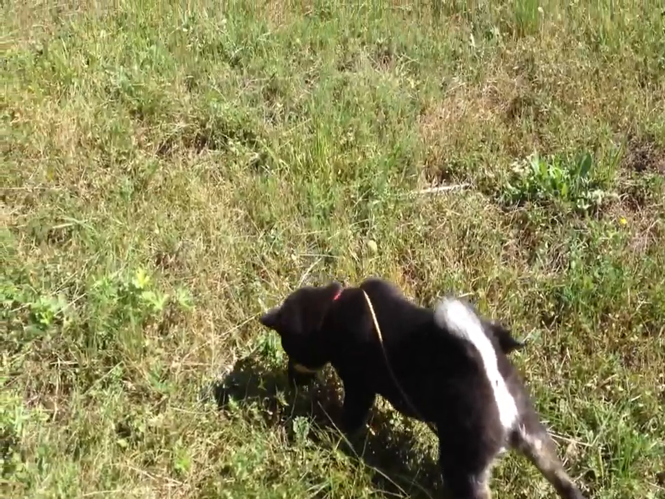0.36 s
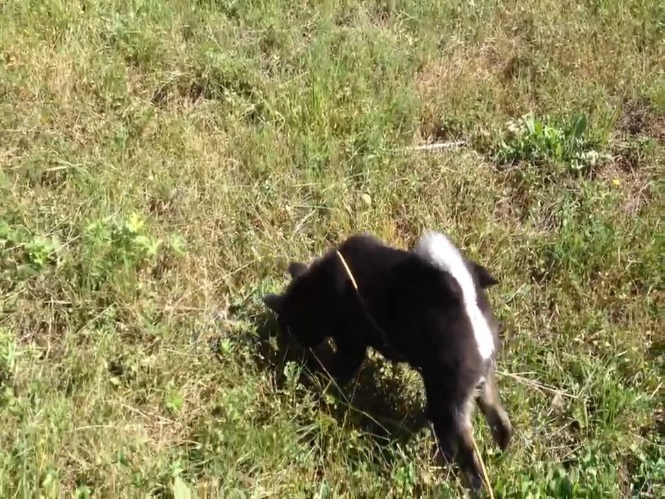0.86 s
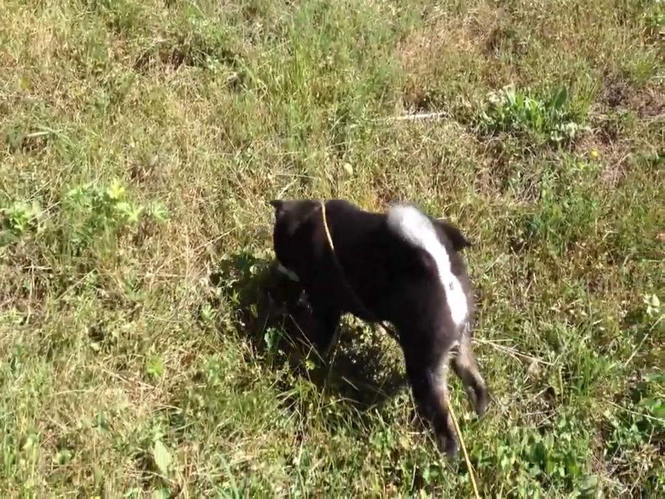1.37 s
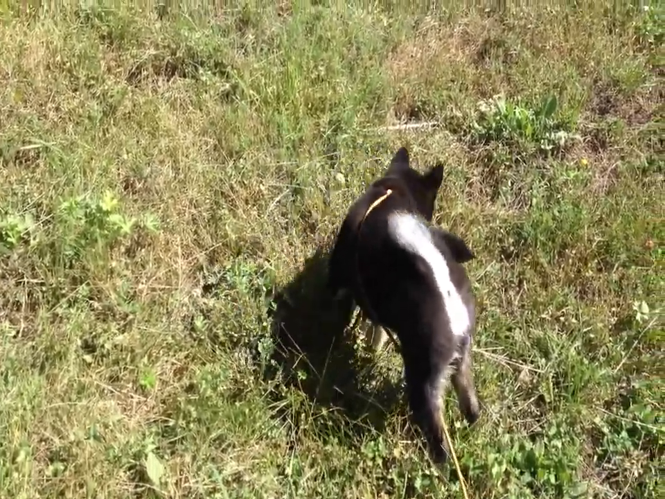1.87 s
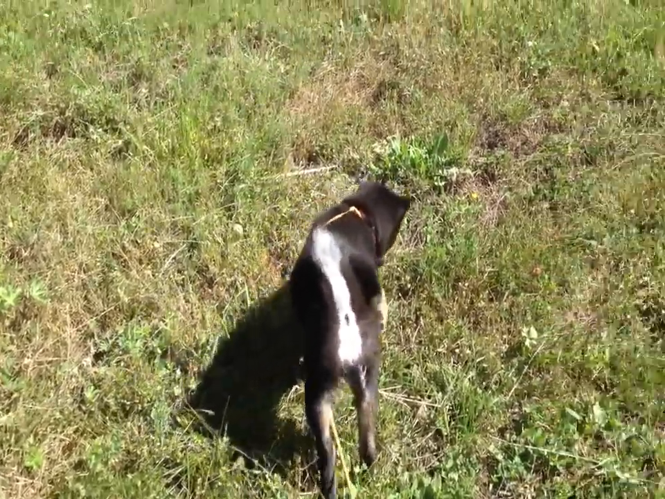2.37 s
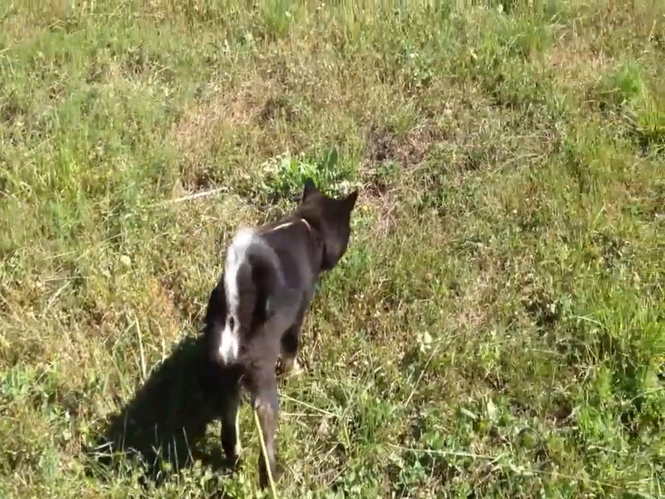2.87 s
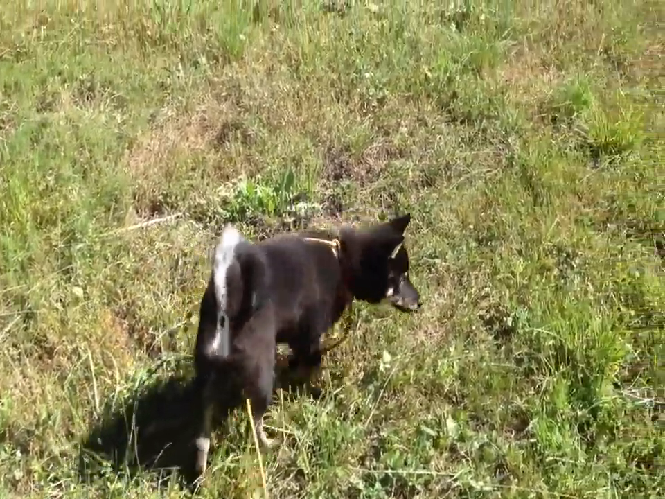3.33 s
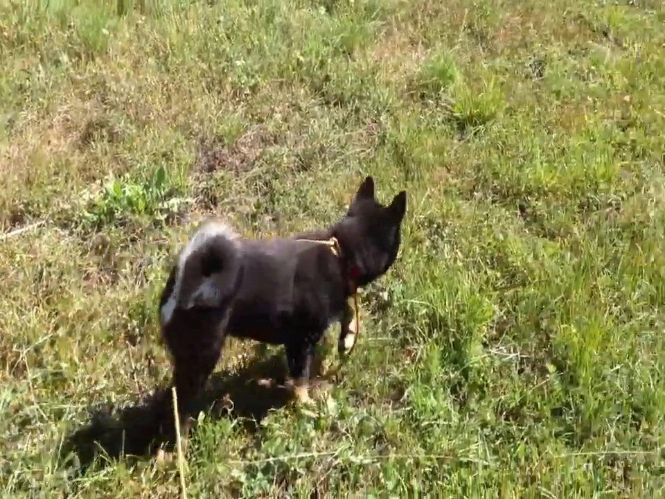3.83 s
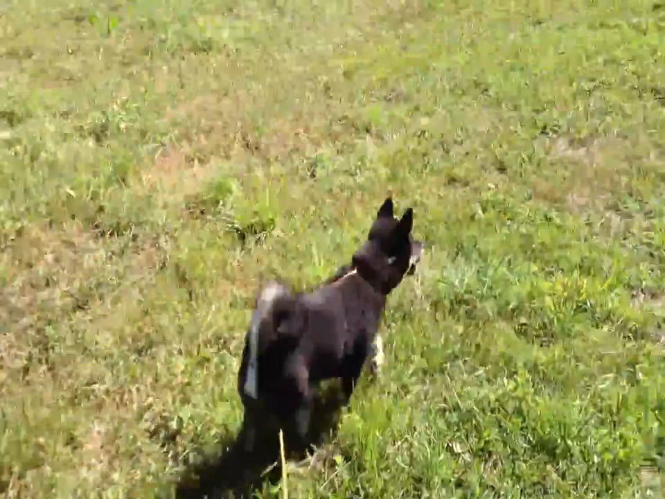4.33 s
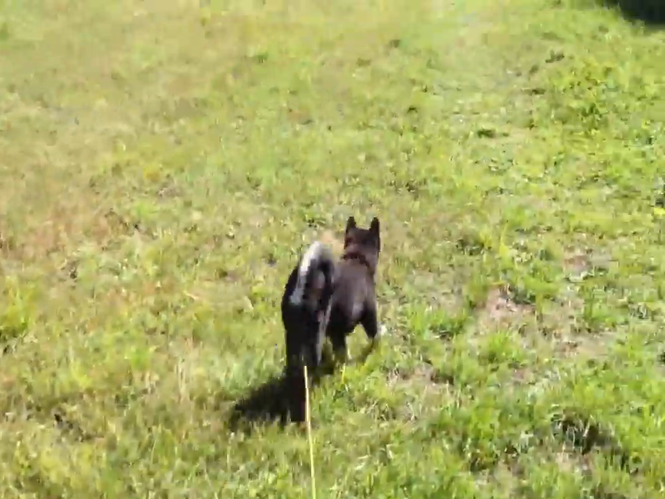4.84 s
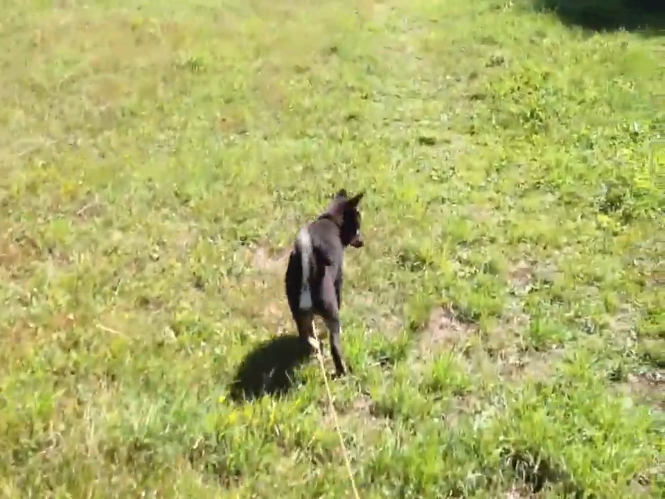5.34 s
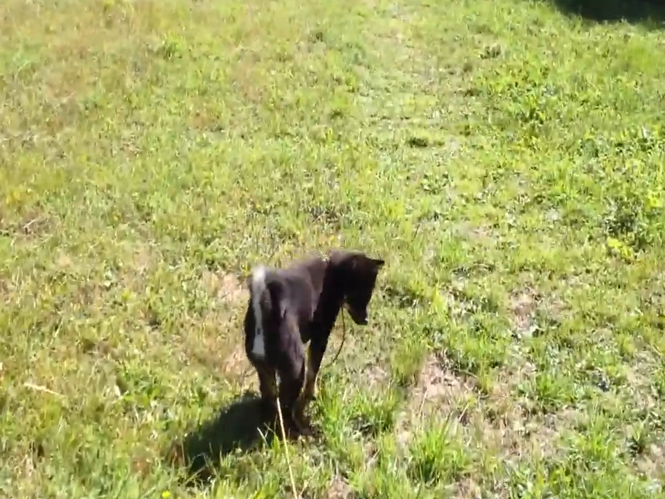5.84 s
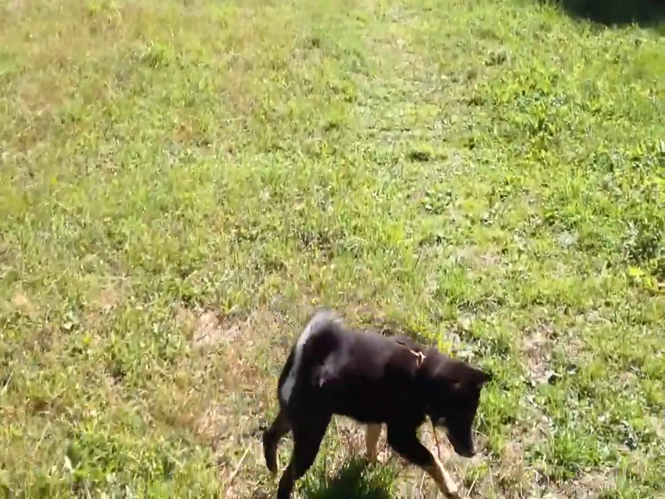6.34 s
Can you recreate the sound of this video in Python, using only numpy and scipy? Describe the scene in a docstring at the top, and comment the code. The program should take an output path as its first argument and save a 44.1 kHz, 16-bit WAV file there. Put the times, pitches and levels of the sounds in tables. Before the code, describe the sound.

Insects hiss and throb over a summer field with grasshoppers rasping short trills; a small dog snorts once, then trots through crackling dry grass.

```python
"""A throbbing insect chorus lies over a summer field with two far engines droning; near grasshoppers
rasp short trills. A small dog snorts, then trots through dry grass, stems snapping under its paws.
Snort, grass, chorus and air are shaped noise or random ticks; trills are pegs dragged over a resonant wing;
bumps on the handheld housing are short sines, and the engines are sums of firing orders."""
import sys
import numpy as np
from scipy import signal
from scipy.fft import rfft, irfft
from scipy.io import wavfile
from scipy.ndimage import uniform_filter1d

SR = 44100
rng = np.random.default_rng(int(sys.argv[2]) if len(sys.argv) > 2 else 0)


def boost(x):
    """Linear amplitude factor 10**(x/20) for a level x in decibels (scalar or array-like)."""
    u = np.asarray(x, float) / 20
    return 10 ** u


def wav_record(signal):
    """Record a signal, one row per channel, as 16-bit PCM in the file named by sys.argv[1]."""
    frames = np.transpose(np.atleast_2d(signal))
    bounded = np.clip(frames, -1, 1)
    # unit amplitude maps onto the largest positive 16-bit level
    quanta = np.round(bounded * 32767).astype(np.int16)
    wavfile.write(sys.argv[1], SR, quanta)


N = 284220
TIME = np.arange(N) / SR


def snort():
    """Air forced through the nostrils, fluttering; the harder the blow, the larger the share of hiss."""
    # the blow: t/s, level/dB
    blow = [(1.41, -81), (1.43, -48), (1.45, -39), (1.465, -36.5), (1.485, -40), (1.505, -44),
            (1.515, -49.5), (1.55, -63), (1.6, -78)]
    # hollow of the muzzle: f/Hz, relative level/dB per Hz
    muzzle = [(200, -15), (350, -10), (700, -10.5), (1300, -6), (2000, -10.5), (3000, -8), (4500, -7),
              (7000, -22)]
    # hiss at the nostrils: f/Hz, relative level/dB per Hz
    nostrils = [(1500, -39), (3000, -16), (4500, -6.5), (6500, -3.5), (8500, -5), (11500, -15.5)]
    all_hiss_db, hiss_range_db = -35.3, 46  # all hiss at the first level, none this far below it
    level_db = curve(blow, 1)
    hollow = colour(rng.standard_normal(N), muzzle)
    hiss = colour(rng.standard_normal(N), nostrils)
    hiss_share = 1 - (all_hiss_db - level_db) / hiss_range_db
    breath = patchy(blend(hollow, hiss, hiss_share), depth_db=2.0)
    return breath * boost(level_db + 0.46 * drift(hz=120))


def grass():
    """Dry stems rub in clumps of ticks and crunch under weight; single stems crack, with a short hollow thud."""
    # light swish of blades: f/Hz, relative level/dB per Hz
    blades = [(400, -30), (1000, -5.5), (1600, 1), (2500, -0.5), (5000, 2), (8000, -5), (11500, -37)]
    # pressed turf: f/Hz, relative level/dB per Hz
    turf = [(120, 1.5), (300, -2), (600, -2), (1000, 0.5), (2000, -8), (4000, -10.5), (9000, -9)]
    # stems that snap under a paw: t/s, thud level/dB before its envelope, thud f/Hz, crack level/dB likewise
    snaps = [(4.067, -58, 340, -45), (4.168, -59, 1200, -45), (4.726, -48, 630, -55),
             (4.939, -60, 810, -39), (5.156, -45.5, 850, -47), (5.229, -46.5, 440, -50),
             (5.469, -53, 870, -52), (5.906, -61, 486, -50), (6.2063, -41.5, 345, -31.5),
             (6.286, -48, 394, -43), (6.322, -43.5, 455, -36.5)]
    blade_ticks = crackle(per_s=6000, spread_db=2.0) * boost(0.84 * drift(hz=50))
    swish = patchy(colour(blade_ticks, blades), depth_db=2.0)
    rub = colour(crackle(per_s=2500, spread_db=2.0) * boost(1.17 * drift(hz=30)), turf)
    press = blend(rub, crunch(), share=0.27)
    gain, weight = paws()
    out = gain * blend(swish, press, weight)
    t = np.arange(1300) / SR
    crack = np.sin(2 * np.pi * 2900 * t) * np.exp(-t / 0.00022)
    noises = rng.standard_normal((len(snaps), len(t)))
    for (s, thud_db, hz, crack_db), noise in zip(snaps, noises):
        thud = np.sin(2 * np.pi * hz * t) * np.minimum(t / 0.0017, 1) * np.exp(-t / 0.0036)
        splinter = uniform_filter1d(noise, size=5) * np.exp(-t / 0.0033)
        add(out, s, boost(thud_db) * thud + boost(crack_db) * (crack + 0.39 * splinter))
    return out


def paws():
    """Drag and steps add up in power: returns gain and the weight on the ground."""
    # legs and lead dragging through the grass: t/s, level/dB
    drag = [(3.55, -90), (3.7, -64.5), (3.95, -67.5), (4.25, -64.5), (4.42, -61), (4.5, -59), (4.7, -56),
            (4.82, -58), (5.12, -57), (5.3, -58), (5.55, -58), (5.6, -61.5), (5.72, -56), (5.77, -63),
            (5.89, -69), (5.92, -57.5), (6.25, -59), (6.44, -65)]
    # paw steps: t/s, peak level/dB, rise/s per 20 dB, fade/s per 20 dB, weight on the ground/0-1
    steps = [(3.72, -62, .05, 0.18, 0.23), (4.07, -54, 0.096, 0.028, 0.27), (4.18, -59, 0.12, .1, .3),
             (4.47, -54.5, .08, 0.043, 0.091), (4.63, -56, .1, 0.11, 0.28), (4.71, -56, 0.14, .08, .4),
             (4.94, -56.5, 0.055, 0.088, 0.16), (5.05, -56, 0.09, .06, .3), (5.16, -55.5, 0.08, 0.046, 1),
             (5.25, -56, .2, 0.091, 0.76), (5.47, -54.5, 0.11, 0.13, .1), (5.58, -58, .15, 0.015, .9),
             (5.908, -48.5, .012, 0.036, 0.57), (6.03, -51, 0.18, 0.27, .15),
             (6.17, -50, 0.082, 0.071, 0.89), (6.21, -52.5, 0.054, 0.057, 0.27),
             (6.32, -56.5, 0.14, .2, 0.76)]
    drag_weight = 0.41
    power = boost(curve(drag, 1)) ** 2
    weighted = drag_weight * power
    for s, db, rise_s, fade_s, load in steps:
        away = np.where(TIME < s, (s - TIME) / rise_s, (TIME - s) / fade_s)
        step = boost(db - 20 * np.minimum(away, 6)) ** 2
        power = power + step
        weighted = weighted + load * step
    return np.sqrt(power), weighted / power


def crunch():
    """Sparse grains a few cycles long: stalks giving way one by one."""
    t, out = np.arange(500) / SR, np.zeros(N)
    for hz in np.geomspace(300, 3200, 12):
        grain = np.sin(2 * np.pi * hz * t) * t * np.exp(-t * hz / 1.33)
        grain = grain / np.linalg.norm(grain) * (300 / hz) ** 0.22  # higher stalks are weaker
        out += signal.oaconvolve(crackle(per_s=35, spread_db=2.5), grain)[:N]
    return evened(out)


def grasshoppers():
    """A stroke drags the leg's pegs over the wing for 5 ms, with a faint echo off the stems."""
    # broad body of a stroke: f/Hz, relative level/dB per Hz
    rasp = [(2800, -58), (4200, -14.5), (5500, -5.5), (8000, -1.5), (11500, -9.5)]
    pegs = crackle(per_s=20000, spread_db=1.5)
    body, out, t = colour(pegs, rasp), np.zeros(N), np.arange(900) / SR
    scrape = np.exp(-abs((t - .0035) / 0.0021) ** 3)
    echo = 0.31 * np.minimum(t / 0.0052, 1) * np.exp(-t / 0.026)
    for s, db, hz in strokes():
        at = min(round(s * SR), N - len(t))
        wing = evened(ring(pegs[at:at + len(t)], hz, width_hz=660))
        burst = (scrape + echo) * (0.66 * body[at:at + len(t)] + 0.55 * wing)
        loudest = uniform_filter1d(abs(burst), size=60).max()
        add(out, s - .0015, boost(db) * burst / loudest / np.pi)
    return out


def strokes():
    """Each trill swells to its peak and fades while the wing's pitch sinks: rows (s, dB, Hz)."""
    # near trills: first stroke t/s, last stroke t/s, peak level/dB (of pi times the short-term mean magnitude,
    # before scatter), wing resonance f/Hz halfway through, place of the peak/0-1
    trill_rows = [(0.349, 0.428, -33, 8350, 0.47), (0.4516, 0.556, -34, 8150, 0.3),
                  (0.482, 0.521, -43, 8700, .4), (0.8403, 0.945, -32.5, 8800, 0.34),
                  (1.095, 1.1997, -32.5, 8000, 0.62), (1.398, 1.441, -34, 7800, 0.9),
                  (1.692, 1.7905, -32.5, 7700, .6), (1.909, 2.013, -33.5, 8200, 0.52),
                  (2.3495, 2.4333, -31, 7400, .8), (2.488, 2.5676, -32, 8600, .55),
                  (2.9647, 3.0622, -31.5, 7800, .65), (3.0834, 3.146, -32, 8100, 0.2),
                  (3.586, 3.684, -30, 8600, 0.65), (3.63, 3.734, -31, 8600, 0.3),
                  (4.113, 4.195, -31, 9100, 0.64), (4.221, 4.298, -31.5, 7900, 0.6),
                  (4.318, 4.3774, -32.5, 7900, 0.45), (4.6936, 4.752, -30.5, 8500, 0.2),
                  (4.813, 4.8946, -30, 7400, .35), (5.074, 5.0938, -33, 8200, .9),
                  (5.3675, 5.471, -30.5, 7900, 0.57), (5.734, 5.773, -34, 8220, 0.7),
                  (5.818, 5.922, -33, 7100, 0.45), (6.353, 6.434, -31, 8200, 0.9)]
    swell_db, fade_db = 0.45, 0.96  # loss one stroke from the peak; cubic before it, square after
    fall_hz, scatter_hz, scatter_db = 580, 350, 0.8  # pitch fall per stroke; chance in pitch and level
    rows = []
    chances = rng.standard_normal((len(trill_rows), 2, 8))
    for (first, last, db, hz, peak), luck in zip(trill_rows, chances):
        s = beats(first, last)
        number = np.arange(len(s))
        away = number - peak * (len(s) - 1)
        loss_db = np.where(away < 0, swell_db * away ** 2 * -away, fade_db * away ** 2)
        wing_hz = hz - fall_hz * (number - (len(s) - 1) / 2) + scatter_hz * luck[0, :len(s)]
        stroke_db = db - loss_db + scatter_db * luck[1, :len(s)]
        rows += zip(s, stroke_db, np.clip(wing_hz, 4000, 11000))
    return rows


def beats(first, last):
    """Evenly spaced moments from first to last, about one stroke gap apart."""
    gap_s = .0203
    return np.linspace(first, last, round((last - first) / gap_s) + 1)


def ticks():
    """Dry wing clicks of about a millisecond from another insect, cut from coloured noise."""
    # tone of a click: f/Hz, relative level/dB per Hz
    click_tone = [(1800, -20), (3000, -18), (5000, -6), (8000, 0), (11500, -4.5)]
    # runs of clicks: first t/s, last t/s, first peak level/dB, last peak level/dB
    runs = [(.1454, .166, -42, -44), (1.011, 1.053, -42, -41.5), (1.583, 1.643, -45, -42),
            (2.594, 2.676, -38.5, -42), (2.693, 2.753, -36, -36), (2.775, 2.874, -35, -38)]
    grit, out, t = colour(rng.standard_normal(N), click_tone), np.zeros(N), np.arange(300) / SR
    envelope = np.minimum(t / 0.00074, 1) * np.exp(-t / 0.001)
    for first, last, first_db, last_db in runs:
        times = beats(first, last)
        for s, db in zip(times, np.linspace(first_db, last_db, len(times))):
            tick = grit[round(s * SR):][:len(t)] * envelope
            add(out, s, boost(db) * tick / abs(tick).max())
    return out


def chorus(trills):
    """A grainy hiss of many insects, the nearer ones rasping in step 23 times a second; it thins under a loud trill."""
    # far insects: t/s, level/dB before thinning, share that throbs/0-1
    far_insects = [(0.0, -53, 0.28), (0.45, -52.5, 0.2), (1.09, -53, 0.4), (1.34, -50.5, 0.23),
                   (1.52, -53.5, 0.32), (2.04, -52, 0.37), (2.35, -52, 0.27), (2.65, -51.5, 0.23),
                   (2.83, -53, 0), (3.25, -51, 0.18), (4.02, -50.5, 0.4), (4.32, -50.5, 0),
                   (4.64, -48, 0.12), (5.11, -51, 0.5), (5.42, -52, 0.47), (6.06, -51, 0.23),
                   (6.44, -55.5, 0.3)]
    # pulse of the nearer ones: t/s, throbs counted so far
    throb_count = [(0.0, -0.39), (0.5, 10.8), (2.25, 51.5), (3.2, 73.9), (5.0, 114.5), (6.44, 146.5)]
    # steady hiss: f/Hz, relative level/dB per Hz
    hiss_tone = [(2000, -28), (3000, -24), (4200, -13.5), (5800, -9.5), (8200, -2), (10500, -3.5),
                 (11500, -12.5)]
    # throbbing rasp: f/Hz, relative level/dB per Hz
    throb_tone = [(3000, -24.5), (5500, -17.5), (7000, -3), (8000, 2), (9500, -6), (11500, -7)]
    hiss = patchy(colour(crackle(per_s=20000, spread_db=2.0), hiss_tone), depth_db=2.0)
    hiss = hiss * boost(0.7 * drift(hz=148) + 0.7 * drift(hz=25.2))
    angle = 2 * np.pi * curve(throb_count, 1)
    gate = evened(np.exp(0.79 * np.cos(angle) - 0.089 * np.cos(2 * angle)))
    throb = patchy(colour(crackle(per_s=12000, spread_db=1.0), throb_tone), depth_db=2.5)
    throb = throb * gate * boost(2.9 * drift(hz=90.5))
    trill_db = 10 * np.log10(abs(uniform_filter1d(trills ** 2, size=1800)) + 1e-12)
    thinning_db = 0.17 * np.maximum(trill_db + 52, 0)
    return boost(curve(far_insects, 1) - thinning_db) * blend(hiss, throb, curve(far_insects, 2))


def bumps():
    """Dull bumps on the handheld housing, one low swing each."""
    # bumps: t/s (about 8 ms ahead of the middle), level/dB before the envelope, f/Hz
    knocks = [(.64, -52.5, 109), (0.992, -58, 100), (5.672, -50, 100), (5.776, -51.5, 120)]
    out, t = np.zeros(N), np.arange(-700, 700) / SR
    for s, db, hz in knocks:
        swing = np.sin(2 * np.pi * hz * t) * np.exp(-(t * hz / 0.63) ** 2)
        add(out, s - .008, boost(db) * swing)
    return out


def receding_engine():
    """A far engine drawing away: its firing rate sinks in pitch, strongest around the third order."""
    # firing rate: t/s, f/Hz
    firing_hz = [(0, 88.8), (.6, 88.7), (2.4, 87.3), (3.2, 86.6), (4, 86.2), (4.9, 85.6), (5.8, 85.0),
                 (6.45, 84.4)]
    # loudness: t/s, base level/dB, fullness/dB per order away from the third
    levels = [(0.0, -74, -5), (.4, -69.5, 0), (.8, -70.5, 1), (1.3, -71.5, 2.5), (1.65, -77, 6),
              (2.05, -78.5, 3), (2.4, -66, -7), (2.8, -64, -3), (3.2, -66, 2), (3.6, -63.5, -1),
              (4.0, -70.5, 0.7), (4.4, -68.5, -0.5), (4.8, -75, -5), (5.2, -70, 2.5), (5.6, -74, -1),
              (6.0, -73, 3), (6.44, -71.5, -6)]
    # firing orders: multiple of the rate, level/dB on top of the base
    orders = [(2, -13), (3, -0.5), (4, -5), (5, -14), (6, -12.5)]
    return drone(firing_hz, levels, orders, pivot=3, waver_db=1.5)


def steady_engine():
    """A second far engine holding an almost even firing rate, in two low orders."""
    # firing rate: t/s, f/Hz
    firing_hz = [(0, 75.5), (2.5, 75.3), (6.45, 74.9)]
    # loudness: t/s, base level/dB, brightness/dB per order above the first
    levels = [(0.0, -81, 7), (.4, -77, 2), (.8, -77, -9), (1.6, -70, -10), (2.0, -75.5, 2.5),
              (2.4, -72.5, -3), (3.2, -78.5, 6.5), (3.6, -82.5, 8.5), (4.0, -81, -1.5), (4.4, -85.5, 10.5),
              (4.8, -98, 21), (5.2, -83.5, 12.5), (5.6, -78, 11), (6.44, -82.5, 6)]
    # firing orders: multiple of the rate, level/dB on top of the base
    orders = [(1, -0.2), (2, -0.2)]
    return drone(firing_hz, levels, orders, pivot=1, waver_db=2)


def drone(firing_hz, levels, orders, pivot, waver_db):
    """Firing orders as sines, tilted about one order; level and phase waver on their way through moving air."""
    angle = 2 * np.pi * np.cumsum(curve(firing_hz, 1)) / SR
    out = np.zeros(N)
    for k, db in orders:
        k = round(k)
        wander = 2 * np.pi * rng.random() + 0.14 * k * drift(hz=16)
        level_db = curve(levels, 1) + db + abs(k - pivot) * curve(levels, 2)
        gain = np.sqrt(2) * boost(level_db + waver_db * drift(hz=4.6))  # a sine of rms 1 peaks at root 2
        out += gain * np.sin(k * angle + wander)
    return out


def air():
    """Far traffic over the field and a breeze rumbling at the microphone, both as coloured noise."""
    # far traffic: f/Hz, relative level/dB per Hz
    traffic_tone = [(40, -32), (80, -23), (120, -7), (160, 1), (300, -1.5), (450, -5.5), (700, -9),
                    (1500, -13.5), (3000, -17), (6000, -27)]
    # breeze at the microphone: t/s, level/dB
    breeze = [(0.0, -78), (.43, -80), (.6, -74), (1.15, -72.5), (1.63, -76), (1.92, -71.5), (2.3, -81),
              (2.53, -78), (3.16, -78), (3.4, -77), (4.3, -82), (4.95, -91), (5.4, -80), (5.76, -79),
              (6.44, -77)]
    # tone of the breeze: f/Hz, relative level/dB per Hz
    breeze_tone = [(20, -13), (45, -8.5), (70, -0.5), (110, 4), (200, -19.5)]
    traffic_db = -66.5 + 0.27 * drift(hz=27)
    traffic = boost(traffic_db) * colour(rng.standard_normal(N), traffic_tone)
    return traffic + boost(curve(breeze, 1)) * colour(rng.standard_normal(N), breeze_tone)


def evened(x):
    """Scales to rms 1."""
    return x / np.sqrt(np.mean(x ** 2) + 1e-20)


def curve(rows, column):
    """One column of a table, sample by sample; -150 outside it, which is silence for a level."""
    rows = np.array(rows)
    return np.interp(TIME, rows[:, 0], rows[:, column], -150, -150)


def colour(x, points):
    """Filters by a spectrum drawn on a log-frequency axis, scaling to rms 1."""
    f, db = np.transpose(points)
    hz = np.fft.rfftfreq(len(x), 1 / SR)
    gain = boost(np.interp(np.log(hz + 1), np.log(f), db, -90, -90))
    return evened(irfft(rfft(x) * gain, len(x)))


def drift(hz):
    """Slow chance with rms 1, moving up to about hz times a second."""
    spectrum = rfft(rng.standard_normal(N)) * np.exp(-(np.fft.rfftfreq(N, 1 / SR) / hz) ** 2)
    return evened(irfft(spectrum, N))


def crackle(per_s, spread_db):
    """Random ticks of either sign, a few of them large."""
    size = boost(spread_db * np.minimum(rng.exponential(1, N), 5)) * rng.choice([-1., 1.], N)
    return size * (rng.random(N) < per_s / SR)


def patchy(x, depth_db):
    """Random swells some 10 ms long and 1 kHz wide, as from many scattered sources."""
    z = signal.stft(x, nperseg=128)[2]
    field = uniform_filter1d(rng.standard_normal(z.shape), size=3, axis=0)  # across frequency
    field = uniform_filter1d(field, size=6, axis=1)  # along time
    return evened(signal.istft(z * boost(depth_db * evened(field)), nperseg=128)[1][:N])


def blend(first, second, share):
    """Cross-fades two unrelated sounds at constant power."""
    share = np.clip(share, 0, 1)
    return np.sqrt(1 - share) * first + np.sqrt(share) * second


def ring(x, hz, width_hz):
    """A two-pole resonance."""
    return signal.lfilter(*signal.iirpeak(hz, hz / width_hz, SR), x)


def add(mix, s, sound):
    """Mixes a sound in at time s."""
    part = mix[round(s * SR):][:len(sound)]
    part += sound[:len(part)]


def scene():
    """All sources at one microphone in the open."""
    dog = snort() + grass()
    trills = grasshoppers()
    insects = trills + ticks() + chorus(trills)
    engines = receding_engine() + steady_engine()
    return (dog + insects + bumps() + engines + air())[None]


def band_limit(x):
    """A steep low-pass at the top of the band."""
    return signal.sosfilt(signal.butter(12, 11800, fs=SR, output="sos"), x)


def record(dry):
    """A steep low-pass at 11270 Hz closes the top of the band."""
    low_pass = signal.firwin(2047, 11270, window=("kaiser", 9), fs=SR)
    mix = signal.oaconvolve(dry, low_pass[None], "same")
    return band_limit(mix)


dry = scene()
out = record(dry)
wav_record(out)
```